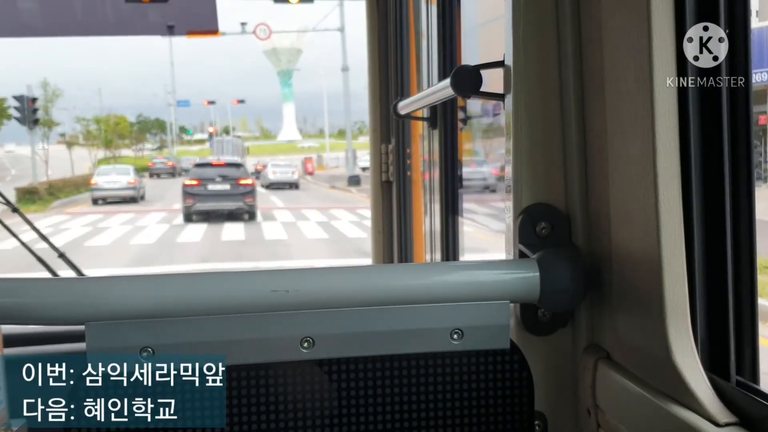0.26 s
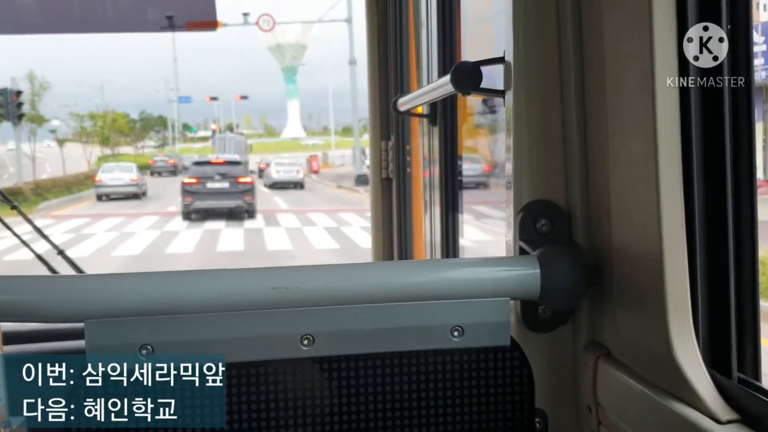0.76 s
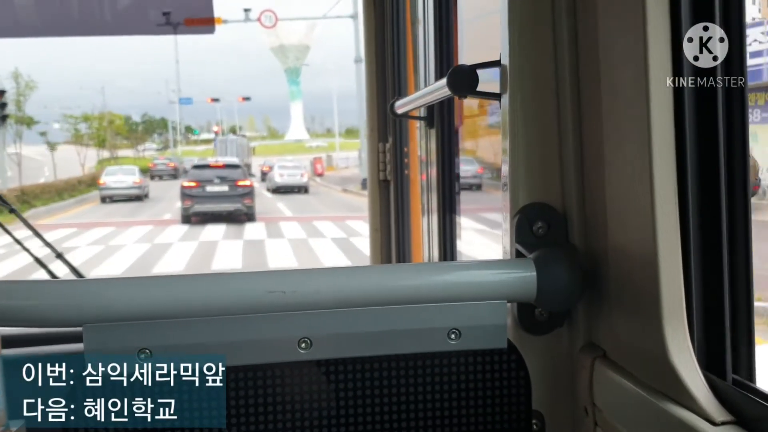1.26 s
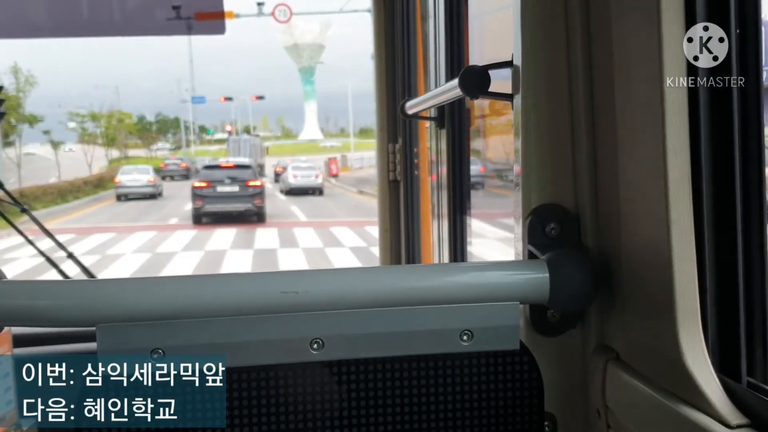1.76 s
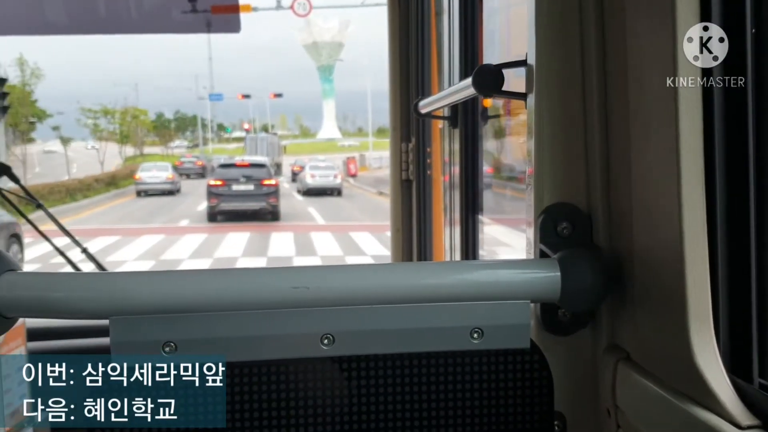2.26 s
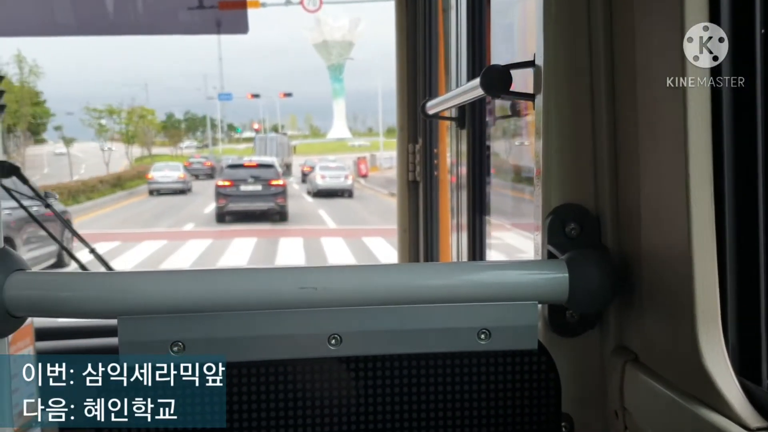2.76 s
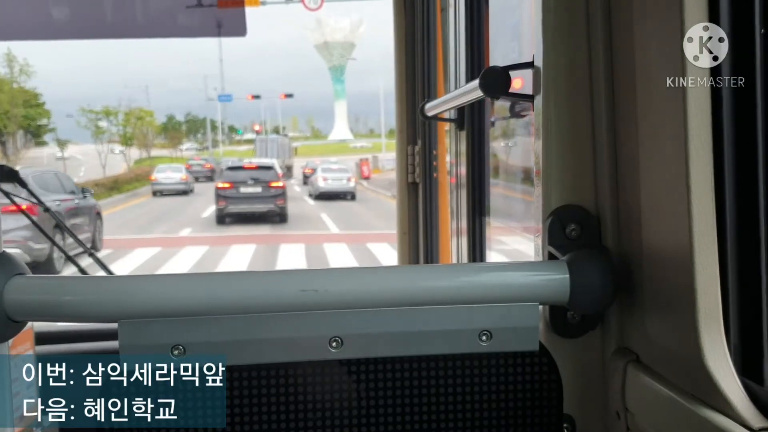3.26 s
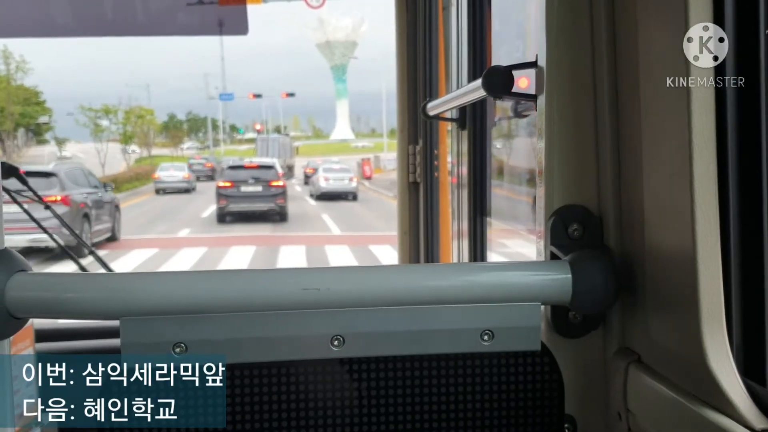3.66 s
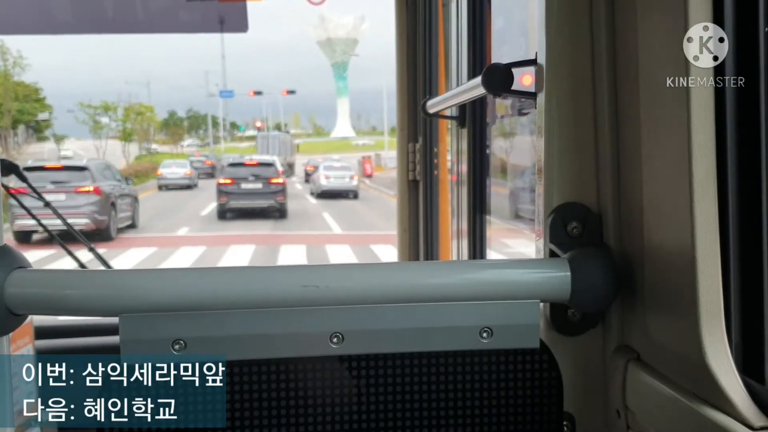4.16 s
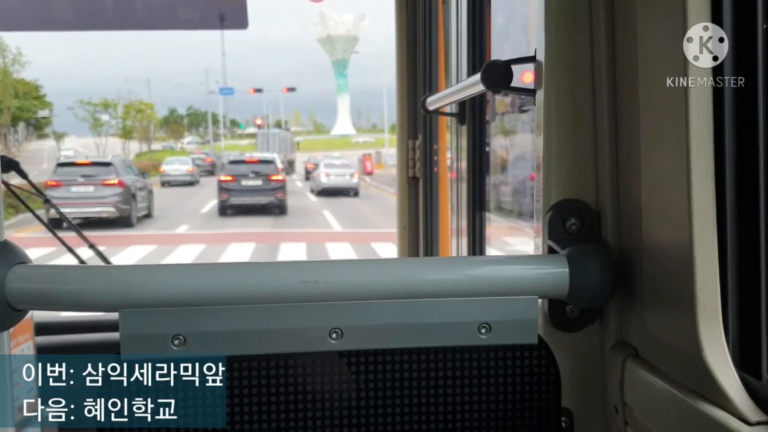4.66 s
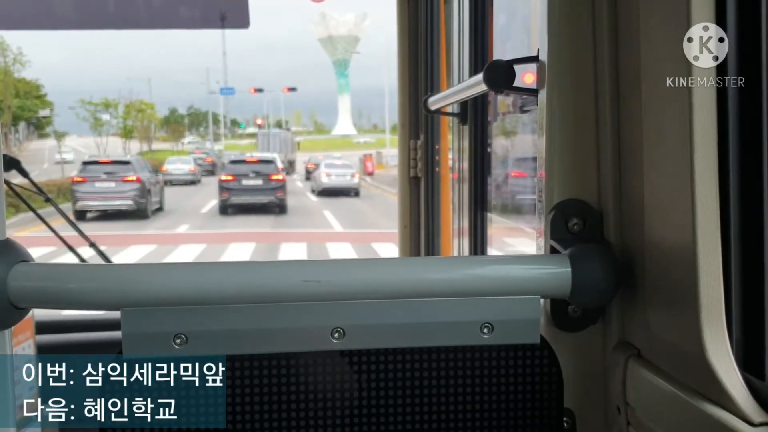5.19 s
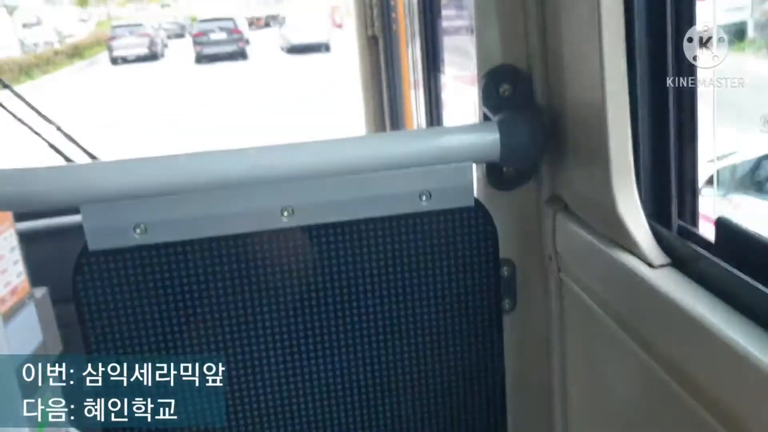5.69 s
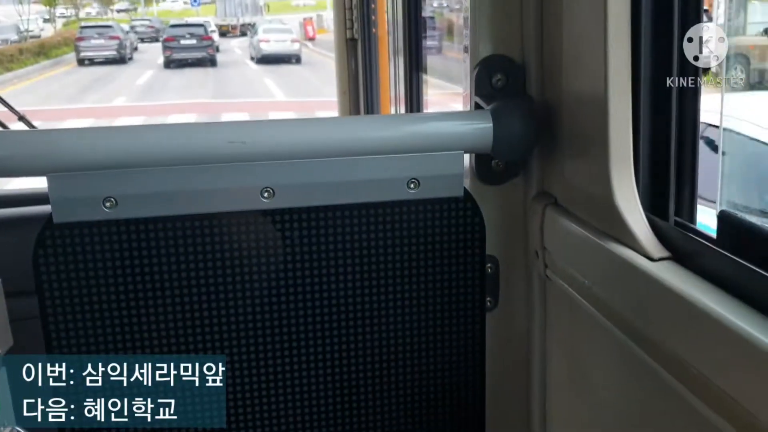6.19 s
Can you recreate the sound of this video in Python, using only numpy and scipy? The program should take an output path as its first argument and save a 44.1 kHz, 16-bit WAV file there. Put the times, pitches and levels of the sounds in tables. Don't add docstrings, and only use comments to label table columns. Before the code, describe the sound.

A bus cabin's low drone dies away amid rattling panels and faint brake squeal, ending in a sharp blast of compressed air and a second softer hiss.

```python
import sys
import numpy as np
from scipy import signal
from scipy.io import wavfile
from scipy.ndimage import uniform_filter1d

SR = 44100
rng = np.random.default_rng(int(sys.argv[2]) if len(sys.argv) > 2 else 0)


def dump(signal):
    limited = np.clip(np.atleast_2d(signal).T, -1, 1)
    pcm = np.round(limited * 32767).astype(np.int16)
    wavfile.write(sys.argv[1], SR, pcm)


def volts_from_decibels(level):
    exponent = np.asarray(level, float) / 20
    return 10 ** exponent


N = 283666
TIME = np.arange(N) / SR
EAR_LAG = 20
BASS_LEAD = 0.25

CABIN_EDGES_HZ = (100.7, 278.6, 2460)


def evened(x):
    return x / np.sqrt(np.mean(np.atleast_2d(x).mean(0) ** 2) + 1e-20)


def read(points, hz):
    f, value = np.transpose(points)
    return np.interp(np.log(hz + 1), np.log(f + 1), value)


def follow(rows, t):
    s, *columns = np.transpose(rows)
    return np.array([np.interp(t, s, c) for c in columns])


def bump(t, s, length):
    return np.exp(-((t - s) / max(length, 0.005)) ** 2)


def ramp(t, s, length):
    return np.sin(np.pi / 2 * np.clip((t - s) / length, 0, 1)) ** 2


def in_db(power):
    return 10 * np.log10(power + 1e-12)


def add(mix, s, sound):
    part = mix[:, round(s * SR):][:, :sound.shape[1]]
    part += sound[:, :part.shape[1]]


def diffuse(count, patchy_db, flicker_db):
    # Hz, likeness of left and right (0 to 1).
    likeness = [(60, .992), (250, .965), (360, .66), (500, .2), (720, .44), (1000, .1), (1250, .32),
                (1600, .3), (2400, .11)]
    # Hz, left over right in dB.
    balance = [(60, -3.5), (110, -1), (200, -1), (380, -8), (700, 1.5), (1290, -0.5), (2380, -5),
               (4400, -3.5), (8120, -3), (11500, -5.5), (15000, -2.5)]
    frames, hz = count // 256 + 5, np.fft.rfftfreq(1024, 1 / SR)
    a, b, c, d, patches = rng.standard_normal((frames, 513, 5)).T
    patches = uniform_filter1d(uniform_filter1d(patches, size=10, axis=0), size=12, axis=1)
    patches = evened(patches.ravel()).reshape(a.shape)
    flicker = rng.standard_normal(frames)
    lead = np.where(hz < 950, BASS_LEAD, 2 * np.pi * hz * EAR_LAG / SR)
    same = (read(likeness, hz) * np.exp(-1j * lead))[:, None]
    left = a + 1j * b
    right = same * left + np.sqrt(1 - abs(same) ** 2) * (c + 1j * d)
    tilt = read(balance, hz)[:, None] / 2
    level_db = np.array([tilt, -tilt]) + patchy_db * patches + flicker_db * flicker
    return hz, np.array([left, right]) * volts_from_decibels(level_db)


def sounded(z, gain, count):
    return evened(signal.istft(z * gain[:, None], nperseg=1024, noverlap=768)[1][:, :count])


def layered(levels_db, edges_hz, hz, z, colour, soft):
    below = [0 * hz] + [1 / (1 + (hz / e) ** soft) for e in edges_hz] + [0 * hz + 1]
    shares = np.sqrt(np.clip(np.diff(below, axis=0), 0, 1))
    return sum(volts_from_decibels(db) * sounded(z, colour * w, len(db)) for db, w in zip(levels_db, shares))


def narrow(hz, width):
    step = 16 if width < 250 else 1
    settling = 400
    r = np.exp(-np.pi * max(width, 1) * step / SR)
    z = rng.standard_normal((len(hz) // step + settling + 2, 2, 2)).T
    z = signal.lfilter([1 - r], [1, -r], z[0] + 1j * z[1])
    z = signal.lfilter([1 - r], [1, -r], z)[:, settling:]
    z = np.array([np.interp(np.arange(len(hz)) / step, np.arange(len(v)), v) for v in z])
    return z / np.sqrt(np.mean(abs(z) ** 2)), np.exp(2j * np.pi * np.cumsum(hz) / SR)


def steadied(z, share):
    z = z / (abs(z) + 0.049) ** np.clip(share, 0, 1)
    return z / np.sqrt(np.mean(abs(z) ** 2))


def shell_levels():
    # time in seconds, level in dB.
    rolling = [(0, 0), (.3, -1), (.68, -2.5), (1.14, -4.5), (1.8, -7.5), (2.4, -7), (2.8, -9.5), (3.6, -8),
               (4.0, -9), (4.42, -7), (5.0, -8.5), (6.43, -13)]
    # time in seconds, boom level in dB, length in seconds.
    shudders = [(0.39, -21.5, 0.13), (.74, -24, 0.08), (1.5, -29, 0.12), (1.95, -35, .06),
                (2.954, -29, 0.07), (4.25, -35.5, .1), (1.056, -21, 0.031), (1.72, -24, 0.06),
                (2.448, -31, 0.2), (3.25, -29.5, 0.26), (3.43, -34, 0.062), (3.7, -30.5, 0.058),
                (4.034, -35, 0.18), (4.581, -30, 0.072), (4.943, -30, 0.063), (5.247, -29.5, 0.043),
                (5.528, -41, 0.15), (5.742, -33.5, 0.11), (6.24, -34, 0.092), (6.43, -32, .07)]
    t = TIME[::200]
    roar_db = follow(rolling, t)[0]

    sway = volts_from_decibels(-40.5 - 1.5 * t) ** 2 + volts_from_decibels(-35.5) ** 2 * bump(t, 1.2, 0.65)
    boom = volts_from_decibels(-30.5 - 4 * t) ** 2 + sum(volts_from_decibels(db) ** 2 * bump(t, s, w) for s, db, w in shudders)
    body_db = -36 + 0.81 * roar_db - 3 * bump(t, 3.37, 0.29)
    turn_s, back_s, edge_s = 5.7, 6.2, 0.044
    shade = ramp(t, turn_s - edge_s, 2 * edge_s) - ramp(t, back_s - edge_s, 2 * edge_s)
    tyre_db = -41 + roar_db - 7.5 * shade
    hiss = volts_from_decibels(-60 + 0.73 * roar_db) ** 2 + volts_from_decibels(-63) ** 2 * ramp(t, 3.4, 1.5)
    return follow(np.transpose([t, in_db(sway), in_db(boom), body_db, tyre_db, in_db(hiss)]), TIME)


def cabin(shell_db):
    # Hz, level in dB per Hz.
    rumble = [(12, -43), (20, -15), (64, 5), (113, -4.5), (134, -16.5), (194, -7.5), (256, -24.5),
              (295, -19.5), (357, -31.5), (624, -26.5), (681, -24.5), (840, -27), (901, -25), (983, -27.5),
              (1300, -30), (1690, -65), (2860, -120)]
    # Hz, level in dB per Hz.
    fizz = [(1000, -2.5), (1730, -5.5), (2000, -10), (2870, -12), (3410, -14.5), (4500, -16.5),
            (5300, -15.5), (7600, -15), (8600, -22), (10200, -18), (11600, -19.5), (12600, -22),
            (14200, -27), (15100, -25), (15600, -50)]
    hz, z = diffuse(N, patchy_db=1.5, flicker_db=0.74)
    colour_db = np.where(hz < 1300, read(rumble, hz), read(fizz, hz) - 27)
    trim_db = np.array([[-10], [-10], [0], [2.5], [3.5]])
    return layered(shell_db + trim_db, (45.3, *CABIN_EDGES_HZ), hz, z, volts_from_decibels(colour_db), 6.8)


def engine(sway_db, boom_db, body_db):
    # time in seconds, rate in Hz, level in dB rms.
    firing = [(0.0, 74.3, -33.5), (0.21, 65.43, -37), (0.41, 72.9, -29.5), (0.75, 62.24, -34),
              (1.0, 69.75, -34.5), (1.72, 58.42, -32), (1.95, 67.02, -40), (2.13, 56.6, -35.5),
              (2.27, 74.27, -38.5), (2.74, 55.9, -38), (4.42, 56.73, -39.5), (4.58, 66.2, -32.5),
              (4.7, 65.2, -39), (5.03, 75.3, -39), (5.21, 57.2, -48), (5.64, 76.8, -41.5),
              (5.82, 56, -43.5), (6.43, 73.6, -46)]
    # pitch in Hz, width in Hz, level in dB over the boom.
    booms = [(42, 25, -5), (73.33, 14.3, -2.5), (90.6, 34, -16), (109, 13, -3.5), (190, 20, -15),
             (229.5, 5.8, -14.5), (289.6, 5.1, -16), (525.6, 34, -19), (675, 72, -30), (882, 47, -26.5)]
    hz, db = follow(firing, TIME)
    late = np.exp([[0], [-1j * BASS_LEAD]])
    z, turn = narrow(hz, 27)
    out = volts_from_decibels(db - 0.5) * evened(((2.0 + 0.38 * z[0]) * turn * late).real)
    for hz, width, db in booms:
        z, turn = narrow(np.full(N, hz), width)
        z = steadied(z, 0.7)
        if hz < 50:
            level_db = sway_db
        elif hz < CABIN_EDGES_HZ[0]:
            level_db = boom_db
        else:
            level_db = body_db + 9
        apart = (0.05 + 0.22 * (hz / 300) ** 2) * z[1] * [[1], [-1]]
        out = out + volts_from_decibels(level_db + db - 5.5) * ((z[0] + apart) * turn * late).real
    return out * volts_from_decibels([[-0.9], [0.9]])


def whistle(start, end, hz, end_hz, width, db):
    count = int((end - start) * SR)
    z, turn = narrow(np.linspace(hz, end_hz, count), width)
    z = steadied(z, 0.93)
    same = np.exp(-(hz / 1000) ** 2)
    z = np.array([z[0], same * z[0] + np.sqrt(1 - same ** 2) * z[1]])
    return start, volts_from_decibels(db + 8.0) * (z * turn).real * signal.windows.tukey(count, 0.4)


def tick(s, db, hz, cycles):
    t = np.arange(-400, 400) / SR
    ring = np.cos(2 * np.pi * hz * t) * np.exp(-(2 * hz * t / cycles) ** 2)
    return s + t[0], volts_from_decibels(db) * np.array([ring, np.roll(ring, EAR_LAG)]) * volts_from_decibels([[-1.5], [1.5]])


def knock(s, db, hz, t60):
    t = np.arange(SR // 2) / SR
    detune = 1 + 0.09 * rng.standard_normal(4) * [0, 1, 1, 1]
    modes = [(0.986, -3), (0.725, -12.0), (1.55, -13.5), (2.3, -23.0)]  # (times the pitch, dB)
    ring = sum(volts_from_decibels(d) * np.sin(2 * np.pi * hz * k * e * t) for (k, d), e in zip(modes, detune))
    swell = volts_from_decibels(db - 60 * t / t60) * (1 - np.exp(-t / 0.0037))
    return s, swell * np.array([ring, np.roll(ring, EAR_LAG)]) * volts_from_decibels([[-2.2], [2.2]])


def spit(s, db, centre_hz, octaves, t60):
    t = np.arange(SR // 2) / SR
    skip = 1024
    hz, z = diffuse(len(t) + skip, patchy_db=0.6, flicker_db=0.8)
    colour = np.exp(-0.5 * (np.log2((hz + 1) / centre_hz) / octaves) ** 2)
    puff = sounded(z, colour, len(t) + skip)[:, skip:]
    rise_s = 0.0027 + 0.038 * t60 ** 2
    return s, volts_from_decibels(db - 60 * t / t60) * (1 - np.exp(-t / rise_s)) * puff


def drum_levels(t, db, rise, release, pan_db):
    # time in seconds, level in dB rms, length in seconds, left over right in dB.
    grabs = [(0.08, -54, 0.055, -4), (0.185, -55.5, 0.056, 1), (0.45, -59, 0.03, 5), (0.59, -53, .015, 0),
             (0.69, -59, 0.05, -3), (.78, -56, .03, -10), (0.907, -51.5, 0.014, -7),
             (0.987, -56.5, 0.05, -10), (1.247, -57, 0.015, -7), (1.36, -58.5, 0.097, -10),
             (1.567, -55, 0.019, -7), (2.448, -47.5, 0.054, 11), (2.587, -36.5, 0.031, 1),
             (2.672, -39, 0.02, 2), (2.93, -52.5, 0.04, -15), (3.05, -40, 0.014, -7),
             (2.769, -48.5, 0.032, -7), (2.837, -43, 0.006, -13), (3.129, -49, .025, 10),
             (3.192, -48.5, 0.02, -13), (3.342, -37, 0.032, -2), (3.426, -42, .025, -10),
             (3.546, -44, 0.036, 4), (3.596, -40, 0.024, -8), (3.695, -49, 0.013, -18)]
    # time in seconds, change in dB, length in seconds.
    slips = [(.33, -7.5, 0.036), (0.573, -8, 0.0073), (0.613, -9, .006), (.86, -12, 0.027),
             (0.945, -4, 0.011), (1.2, -5, 0.025), (1.29, -7, .015), (1.532, -10, 0.0087),
             (2.532, -9, .012), (2.62, -5, 0.0097), (2.7, -5, 0.0086), (3.017, -12, 0.011),
             (3.211, -15, 0.0088), (3.294, -6, .012), (3.396, -3, .01), (3.655, -7, 0.013)]
    side = np.array([[0.5], [-0.5]])
    drag = 1 - ramp(t, release, t[-1] - release)
    force_db = db + side * pan_db - 9 * ramp(t, release, 0.018)
    power = (volts_from_decibels(force_db) * ramp(t, t[0], rise)) ** 2 * drag
    for s, d, w, p in grabs:
        if t[0] < s < t[-1]:
            power = power + volts_from_decibels(d + side * p) ** 2 * bump(t, s, w)
    slip_db = sum(d * bump(t, s, w) for s, d, w in slips)
    return volts_from_decibels(slip_db) * np.sqrt(power)


def squeal(span, force, ends_hz):
    t = np.arange(*span, 1 / SR)
    gain = drum_levels(t, *force)
    hz = np.linspace(*ends_hz, len(t))
    z, turn = narrow(hz, 40)
    tone = (np.array([[1], [np.exp(0.6j)]]) + 0.5 * z) * turn * gain
    calm_db = uniform_filter1d(in_db(gain[0] * gain[1]), size=9000)
    for ratio, near_db, near_width in ((0.9925, -11, 18), (1.012, -14, 25), (1.01, -14, 500)):
        z, turn = narrow(hz * ratio, near_width)
        tone = tone + z * turn * volts_from_decibels(calm_db + near_db)
    return t[0], np.sqrt(2) * tone.real


def hump(hz, centre_hz, width):
    return 1 / (1 + (2 * (hz - centre_hz) / width) ** 2)


def vent_levels(t):
    # start in seconds, rise in seconds, shut at seconds, closing in seconds, sag in dB per second.
    openings = [
        (4.425, 0.055, 4.607, 0.011, -83),
        (4.584, 0.11, 5.4, .08, 43),
        (4.85, 0.22, 5.3, 0.062, 12),
        (5.2, 0.16, 5.67, 0.11, 6),
        (5.383, 0.039, 5.85, 0.087, 70),
    ]
    # low jet in dB, jet in dB, hiss in dB, top hiss in dB.
    opening_db = [
        (-52.5, -60.5, -53, -51),
        (-35, -26.5, -30.5, -28.5),
        (-64, -44, -47, -38.5),
        (-66, -47.5, -56, -50),
        (-65, -66, -40.5, -59),
    ]
    lag = np.array([[0.13], [0.014], [0.00091], [0.00044]])
    share = np.array([[1.12], [1.12], [1.05], [0.9]])
    power = 0
    for (s, rise, shut, closing, sag_db), layers_db in zip(openings, opening_db):
        flow = ramp(t, s, rise + lag) ** 0.78 * (1 - ramp(t, shut - closing, 2 * closing))
        sagged_db = share * sag_db * np.maximum(t - s - rise - lag, 0)
        power = power + (flow * volts_from_decibels(np.array(layers_db)[:, None] - sagged_db)) ** 2
    return in_db(power)


def vent():
    vent_edges_hz = (1770, 5250, 7070)
    # Hz, level in dB per Hz.
    air_colour = [(740, -25.5), (1250, -8), (1350, -15), (1510, -10), (2050, -3.5), (2590, -2.5),
                  (3330, -2.5), (3660, -4.5), (4150, -7), (5130, -11.5), (8240, -9.5), (11400, -1.5),
                  (14100, -6), (15500, -9)]
    # pitch in Hz, width in Hz, level in dB.
    pipe_notes = [(1446, 40, 6), (1560, 30, 8.5), (1708, 20, 2), (1858, 21, 2), (2257, 38, 2),
                  (2550, 63, -1), (2875, 99, -1.5), (3240, 60, -2), (4050, 14, -1), (5330, 20, 0)]
    t = np.arange(4.4, 5.8, 1 / SR)
    hz, z = diffuse(len(t), patchy_db=1.1, flicker_db=0.4)
    pipes = 1 + 1.4 * sum(volts_from_decibels(db) * hump(hz, f, w) for f, w, db in pipe_notes)
    jet = layered(vent_levels(t), vent_edges_hz, hz, z, volts_from_decibels(read(air_colour, hz)) * pipes, 10.7)
    return t[0], jet * signal.windows.tukey(len(t), 0.05) * volts_from_decibels([[-0.4], [0.4]])


def scene():
    # start in seconds, end in seconds.
    squeal_spans = [
        (0, 1.78),
        (2.25, 3.98),
    ]
    # level in dB rms, rise in seconds, release at seconds, left over right in dB.
    forces = [
        (-63, .02, 1.62, -5),
        (-52, .2, 3.72, -3),
    ]
    # start in Hz, end in Hz.
    squeal_pitches = [
        (9660, 9658),
        (5891, 5909),
    ]
    # time in seconds, peak in dB, pitch in Hz, time to fall 60 dB in seconds.
    knocks = [(0.022, -29, 750, 0.041), (0.126, -28, 181, 0.17), (.2, -31, 206, 0.13),
              (0.351, -33, 103, 0.14), (0.555, -20, 207, 0.07), (0.603, -15, 197, 0.079),
              (0.617, -22.5, 228, 0.088), (.631, -22.5, 284, 0.12), (0.677, -18.5, 156, 0.1),
              (0.736, -24, 190, 0.07), (1.071, -30, 400, 0.072), (1.477, -25.5, 182, 0.11),
              (1.7, -29.5, 400, 0.078), (1.78, -28, 197, 0.17), (2.165, -25, 269, 0.045),
              (2.171, -32, 400.7, 0.042), (2.453, -26, 277.6, 0.05), (2.459, -34, 390, 0.05),
              (2.6, -30, 119, .15), (2.64, -35, 190, .15), (3.97, -25, 105, .15), (3.67, -34, 394, 0.037),
              (3.675, -27.5, 262, .08), (3.726, -27, 298, 0.055), (4.632, -10.5, 246, 0.034),
              (4.649, -18, 254, 0.043), (4.6635, -10, 210, 0.024), (4.664, -23, 348, 0.063),
              (4.6759, -20, 236, 0.057), (5.218, -19, 174.5, 0.13), (5.215, -22, 109, 0.15),
              (5.495, -20, 105.1, 0.29), (5.749, -21, 140.9, 0.094), (6.203, -22, 175.3, 0.14),
              (6.205, -28, 321, 0.087), (6.231, -18.5, 85.4, 0.08), (6.245, -30.5, 294, 0.11),
              (6.39, -30, 85, 0.07)]
    # start in seconds, end in
    # seconds, start in Hz, end in Hz, width in Hz.
    whistles = [(0, 1.7, 11650, 11650, 70), (.4, .66, 8650, 8750, 40), (.39, .5, 14200, 14400, 150),
                (.68, .78, 14300, 14450, 150), (.9, 1.0, 3880, 4050, 110), (.93, .985, 4400, 4200, 150),
                (1.4, 1.75, 8300, 8800, 110), (1.65, 1.78, 12800, 12800, 60), (3.05, 3.7, 11800, 11800, 40),
                (4.3, 4.46, 9250, 9150, 60), (4.25, 4.55, 5500, 5500, 40), (5.505, 5.6, 522, 515, 8),
                (5.7, 6.5, 9970, 9970, 120), (5.6, 6.2, 2630, 2630, 240), (5.6, 6.5, 2900, 2900, 2000),
                (5.46, 5.6, 108, 108, 6), (2.36, 2.42, 515, 515, 30), (5.39, 5.72, 6900, 7100, 1800),
                (4.95, 5.72, 2750, 2750, 600), (5.45, 5.6, 12000, 11900, 1500), (0, 6.43, 6570, 6570, 150),
                (6.1, 6.14, 480, 470, 90), (5.25, 6.3, 14900, 14900, 1400), (5.57, 5.68, 510, 548, 8),
                (5.4, 6.2, 360, 360, 160), (5.6, 5.78, 7300, 7500, 1500), (5.75, 6.1, 3700, 3700, 500),
                (.27, .48, 120, 108, 5), (.54, .78, 115, 110, 5), (.88, 1.22, 112, 118, 8),
                (0, .42, 190, 212, 14), (1.62, 2.02, 292, 292, 8), (3.93, 4.25, 106, 104, 6),
                (4.05, 4.52, 225, 222, 8), (1.25, 1.5, 300, 305, 8), (4.76, 5.12, 1530, 1520, 90)]
    whistles_db = [-73, -69, -70, -72, -60.5, -58, -72, -81, -86, -72, -70, -47.5, -73, -63, -60.5, -48,
                   -51.5, -57.5, -54.5, -49.5, -81, -50, -69, -55, -62, -81, -66, -45, -40, -51, -47, -56,
                   -43.5, -54.5, -62.5, -49]
    # time in seconds, level in dB, centre in Hz, spread in octaves,
    # time to fall 60 dB in seconds.
    spits = [(.6315, -29.5, 11000, 0.35, 0.019), (.6405, -33, 13020, 0.29, 0.014),
             (.626, -45, 8300, 0.62, 0.49), (.628, -46, 3100, 0.57, 0.41), (1.58, -55, 5500, 0.36, 0.39),
             (2.061, -46, 10900, 0.17, 0.32), (2.07, -48.5, 5600, 0.97, 0.42),
             (2.32, -53, 5100, 0.58, 0.38), (2.384, -47, 3100, 0.33, 0.11), (2.386, -45, 1700, 0.23, .11),
             (3.05, -62, 7800, 0.59, 0.32), (3.445, -45.5, 4440, 0.45, 0.97),
             (3.47, -45.5, 2040, 0.44, 0.56), (3.49, -56.5, 10700, 0.19, 0.55), (4.62, -32, 820, 0.52, 0.8),
             (4.6465, -16, 6700, 0.72, 0.07), (4.645, -18.5, 2560, 0.32, 0.1),
             (6.1, -42.5, 1000, 0.68, 0.28), (3.03, -44, 650, 0.46, 0.33), (6.21, -44.5, 540, 0.52, 0.5),
             (6.2, -47, 1700, 0.43, 0.42), (6.2, -51.5, 12400, .6, 0.36), (.022, -38.5, 860, 0.3, 0.18)]
    # time in seconds, peak in dB, pitch in Hz, length in cycles.
    ticks = [(.0262, -23, 760, 2), (.6333, -36, 13200, 9), (.6422, -28, 12000, 8), (.6428, -40, 7200, 4),
             (2.1666, -27, 360, 1.1), (2.1744, -33, 420, 1), (2.1768, -32, 420, 1.2),
             (2.3895, -40, 2400, 5), (2.394, -41, 1790, 7.9), (2.399, -42, 3000, 6),
             (2.4568, -27, 430, 1.3), (2.4648, -30, 430, 1.2), (2.473, -33, 500, 1.2),
             (3.6735, -30, 480, 1.2), (3.6835, -32, 330, 0.96), (3.728, -34, 500, 1.4),
             (3.738, -33, 380, 1.1), (4.6523, -23, 300, 1.2), (4.6646, -16, 250, 1.2),
             (4.667, -23, 129, 1.5), (4.6655, -27, 900, 2.5), (4.6765, -16, 223, 2.2),
             (4.658, -27.5, 555, 2.8)]

    shell_db = shell_levels()
    mix = cabin(shell_db) + engine(*shell_db[:3])
    add(mix, *vent())
    for drum in zip(squeal_spans, forces, squeal_pitches):
        add(mix, *squeal(*drum))
    for row in knocks:
        add(mix, *knock(*row))
    for row in np.column_stack([whistles, whistles_db]):
        add(mix, *whistle(*row))
    for row in spits:
        add(mix, *spit(*row))
    for row in ticks:
        add(mix, *tick(*row))
    return mix


def top_cut(x):
    return signal.sosfilt(signal.butter(12, 15680, fs=SR, output="sos"), x)


def record(dry):
    edge = signal.firwin(301, 15480, window=("kaiser", 8), fs=SR)
    mix = signal.oaconvolve(dry, edge[None], "same")
    return top_cut(mix)


dry = scene()
out = record(dry)
dump(out)
```